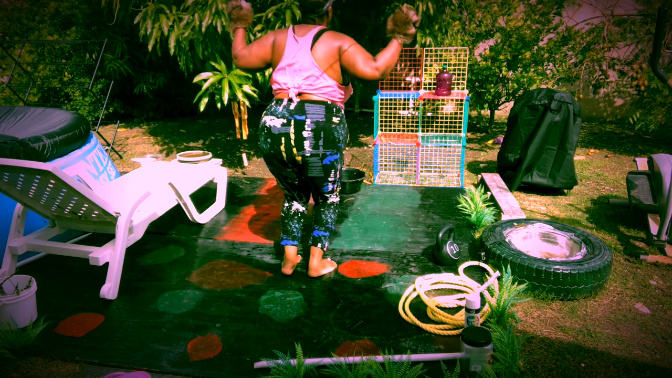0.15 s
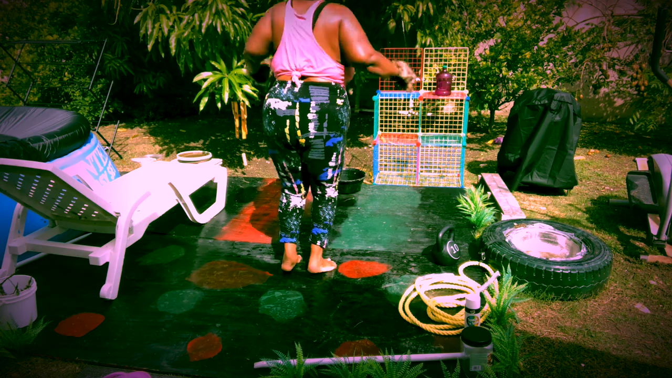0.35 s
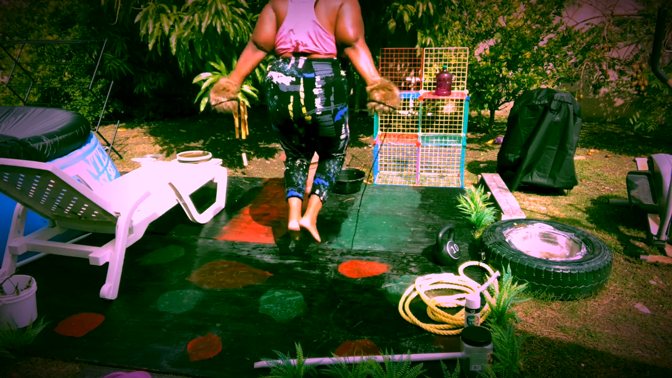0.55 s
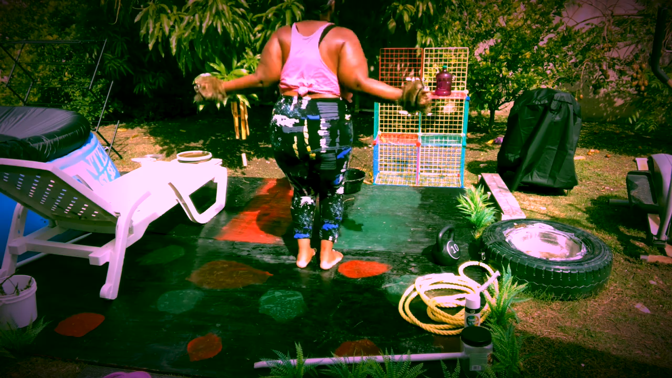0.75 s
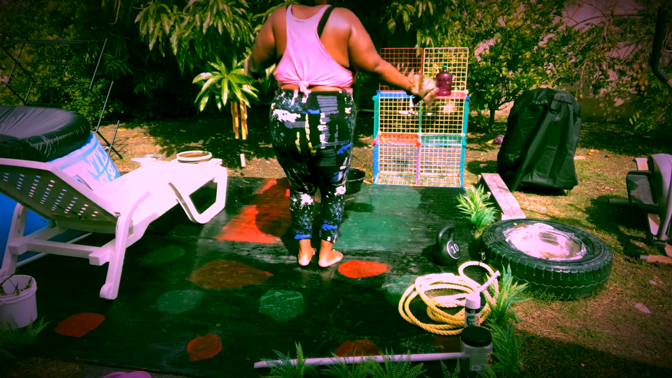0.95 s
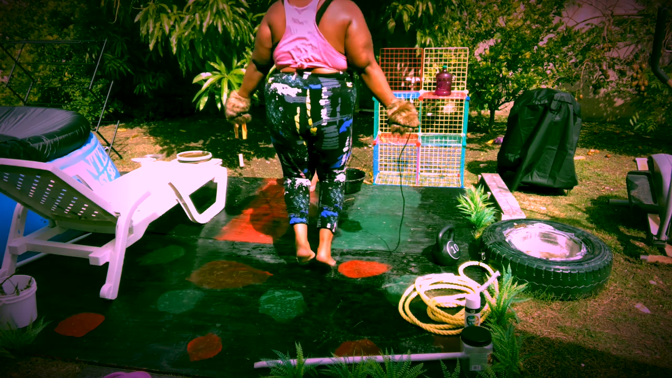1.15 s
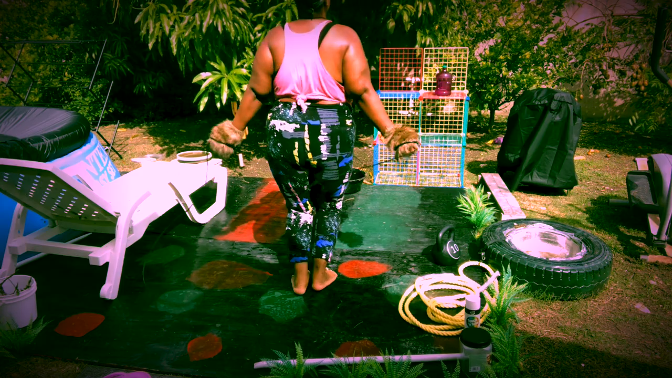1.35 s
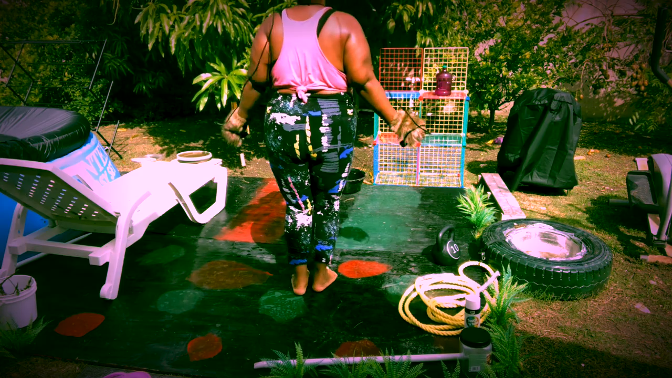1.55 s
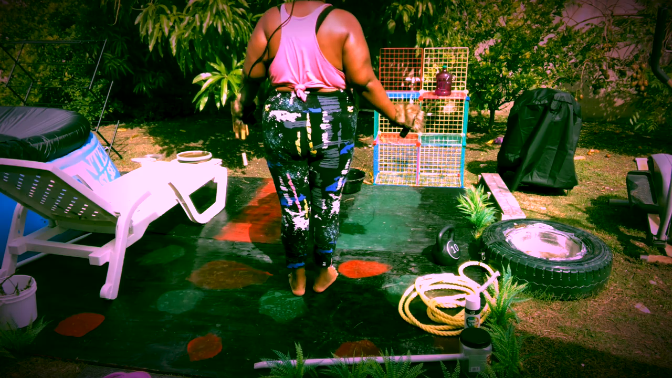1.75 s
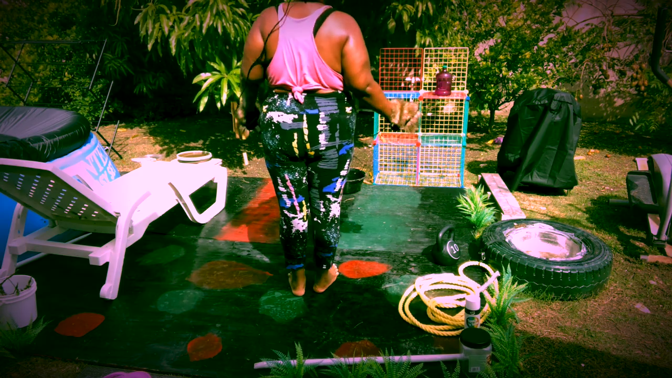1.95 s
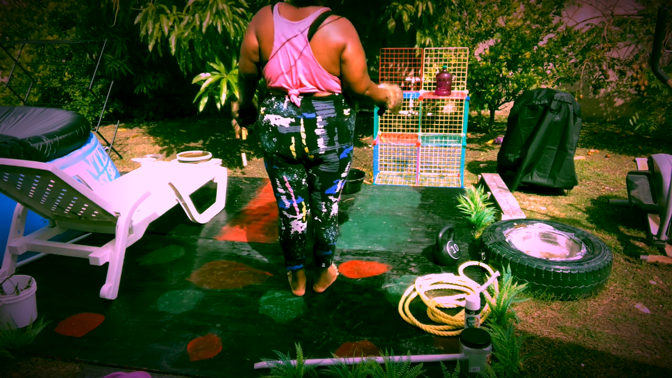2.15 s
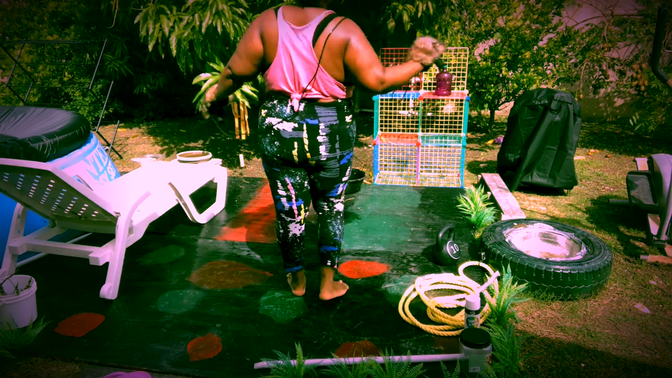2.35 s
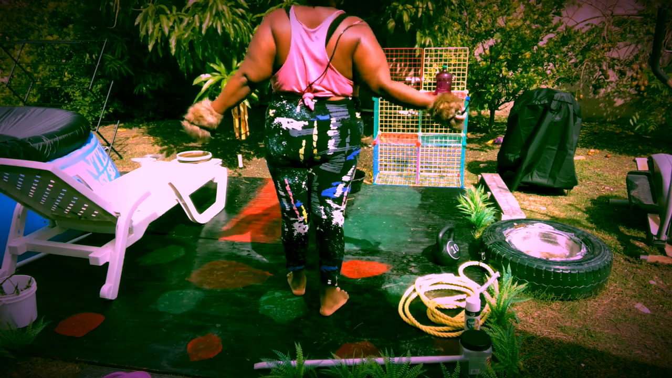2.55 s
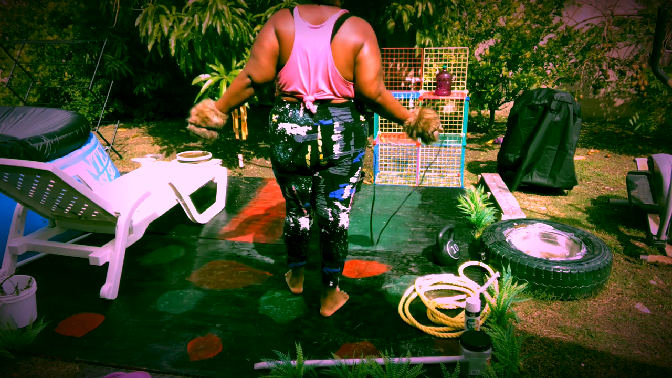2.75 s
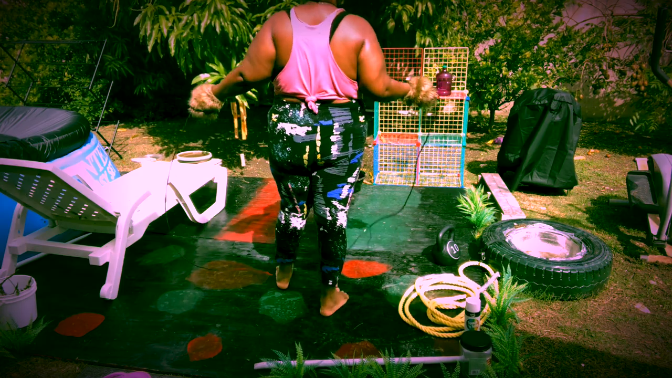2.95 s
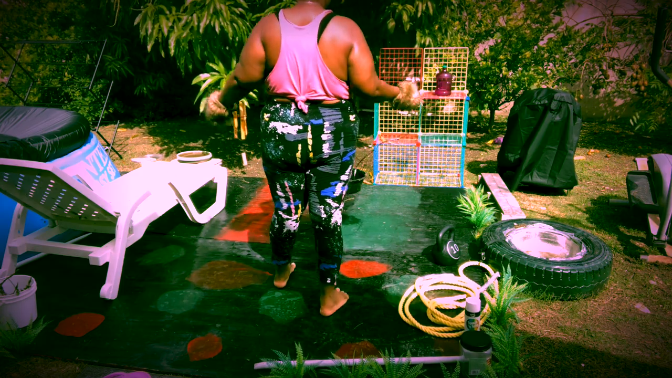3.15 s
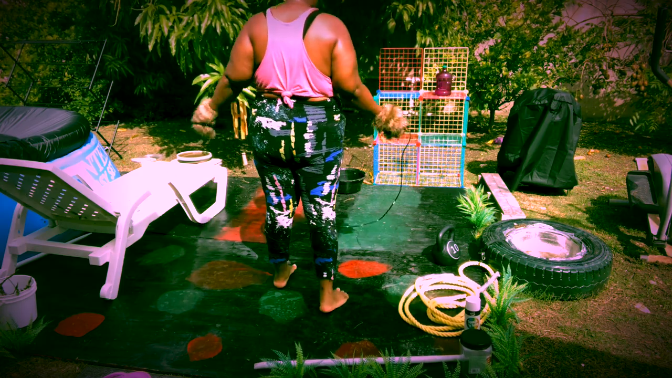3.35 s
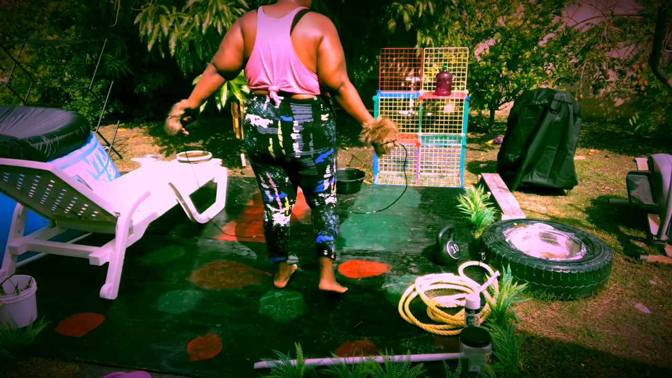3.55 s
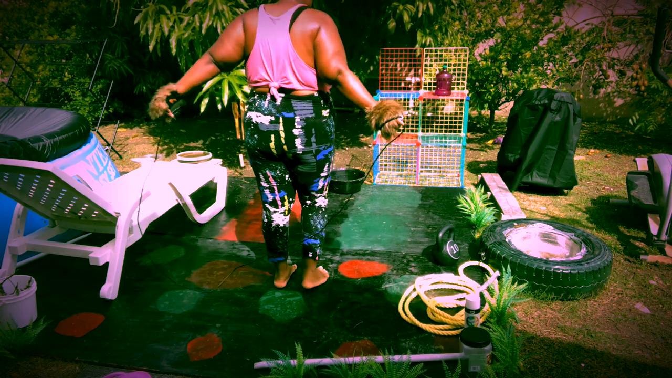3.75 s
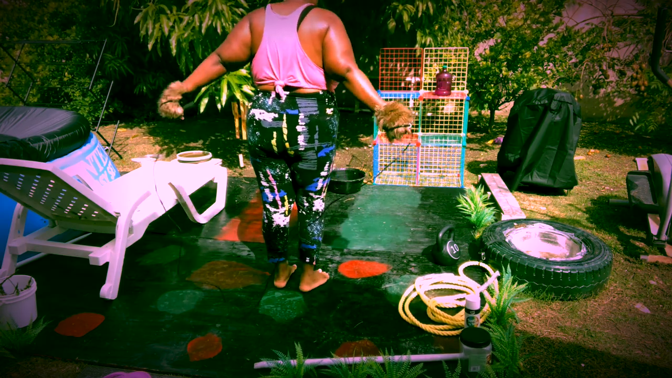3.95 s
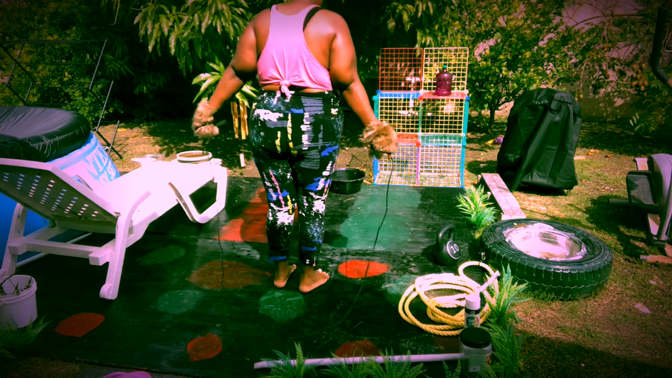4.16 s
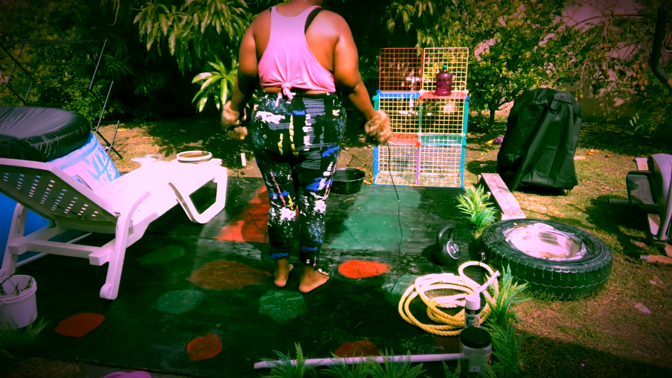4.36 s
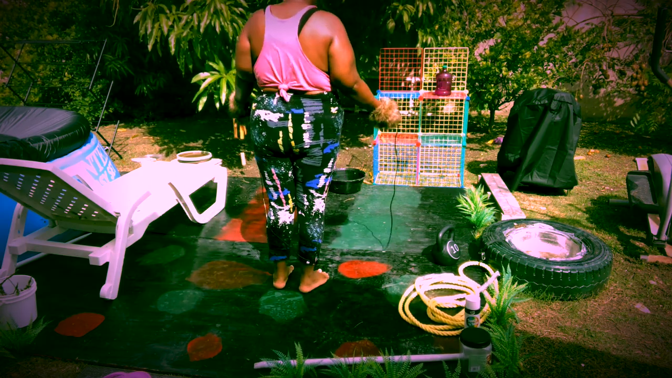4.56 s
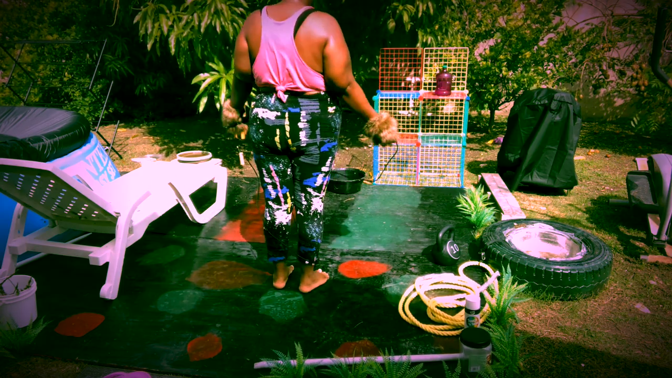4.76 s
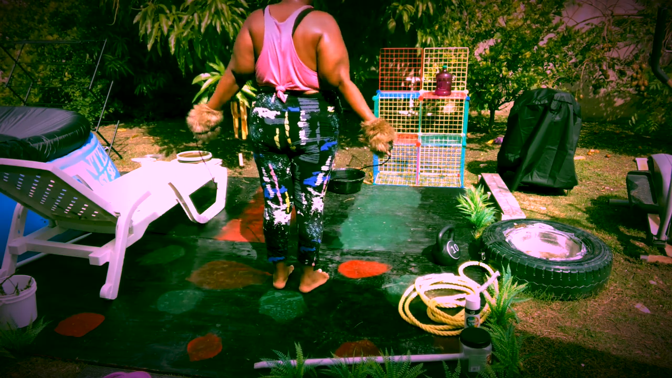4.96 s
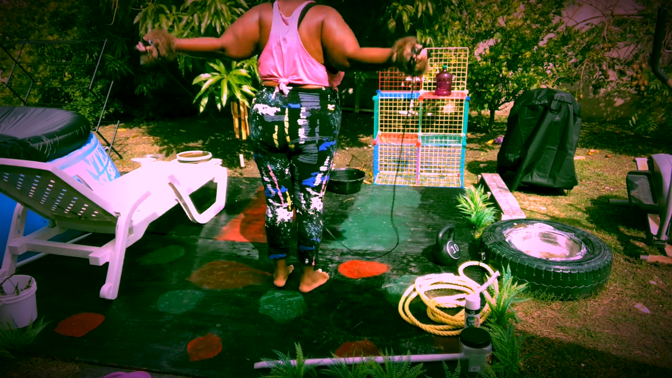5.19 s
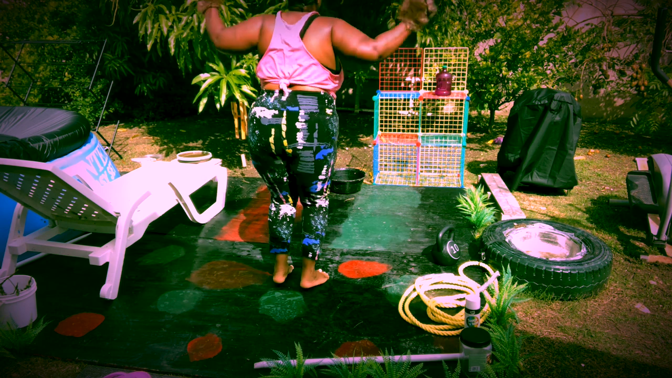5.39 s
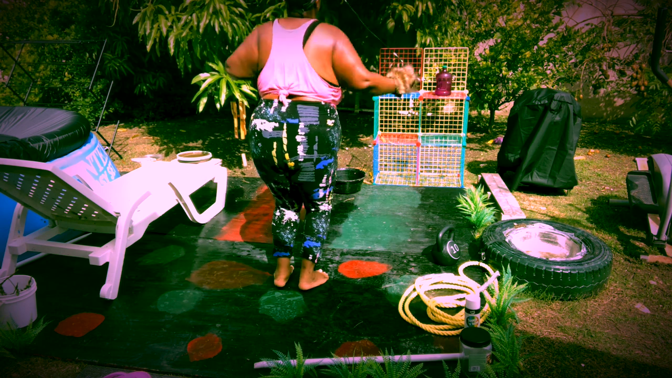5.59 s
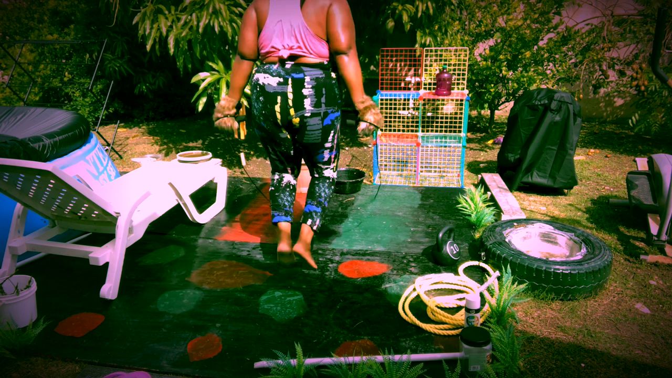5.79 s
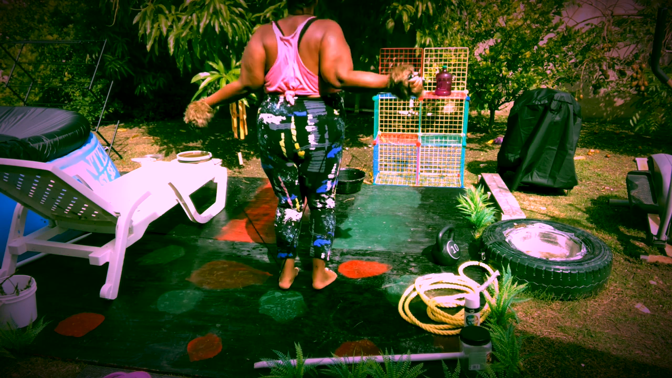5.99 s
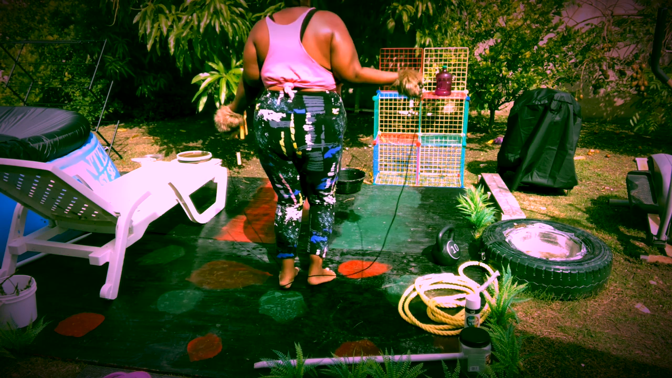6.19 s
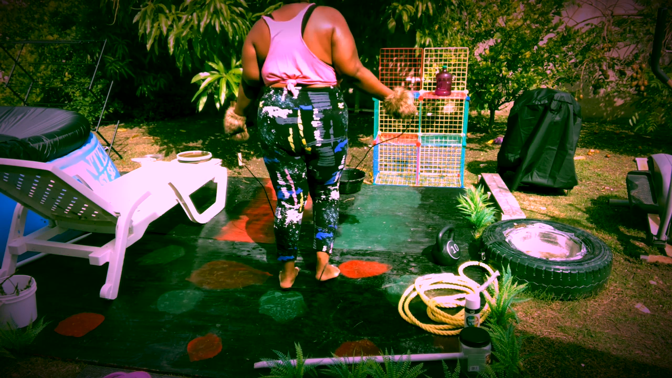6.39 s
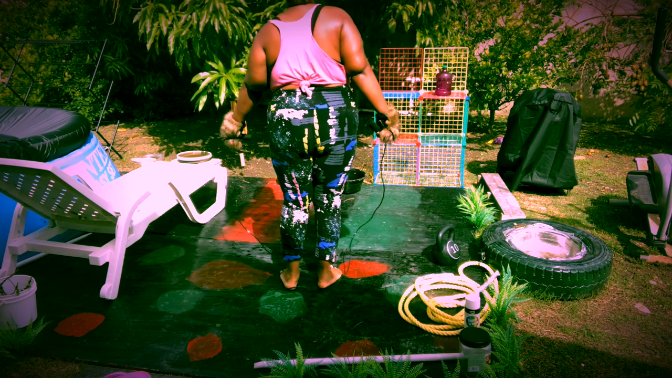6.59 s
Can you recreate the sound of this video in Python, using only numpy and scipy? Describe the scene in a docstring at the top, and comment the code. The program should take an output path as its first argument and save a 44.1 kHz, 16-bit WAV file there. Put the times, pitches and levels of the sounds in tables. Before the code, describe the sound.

A jump rope swishes and cracks on a wet mat outdoors, with bare feet thudding and shuffling between tries over a steady low murmur.

```python
"""Sharp wet cracks, thuds and scuffs: barefoot rope skipping on a wet mat in a back yard, three tries.
The feet scuff off, the rope whistles through the air and cracks on the mat, then the landing thuds
and the mat shudders. Between tries, feet shuffle and the slack rope drags.
Walls and plants scatter each crack over a steady outdoor murmur with two far-off peeps.
Gain control ducks after loud hits; a limiter holds the peaks."""
import sys
import numpy as np
from scipy import signal
from scipy.fft import rfft, irfft, next_fast_len
from scipy.io import wavfile
from scipy.ndimage import uniform_filter1d, minimum_filter1d

SR = 44100
rng = np.random.default_rng(int(sys.argv[2]) if len(sys.argv) > 2 else 0)


def store_wav(level_fs):
    """Save 16-bit WAV to argv[1]."""
    pcm = np.round(np.clip(np.atleast_2d(level_fs), -1, 1) * 32767)
    wavfile.write(sys.argv[1], SR, pcm.T.astype(np.int16))


N = 292383
T = np.arange(SR) / SR  # 1 s, for single events
HZ = np.fft.rfftfreq(SR, 1 / SR)
SMACK_HZ, SMACK_MS = 599, 1.27  # bare sole on the mat
# mat modes: f/Hz, level/dB, t60/s
MAT_MODES = [(102, -11.5, 0.26), (161.4, -12, 0.5), (252.8, -4.5, 0.48), (308.5, -13, 0.67),
             (349.5, -4.5, 0.15), (466.6, -12, 0.25), (593.6, -14.5, .22)]


def amp(db):
    """dB to gain."""
    return 10 ** (np.asarray(db) / 20)


def unit_rms(x):
    """Scale to rms 1."""
    return x / np.sqrt(np.mean(x ** 2) + 1e-20)


def log_interp(points, hz):
    """Interpolate (f/Hz, value) rows over log frequency."""
    f, value = np.transpose(points)
    return np.interp(np.log(hz + 1), np.log(f + 1), value)


def tilted(points, db_per_oct):
    """Spectrum in dB, tilted about 4.5 kHz."""
    return log_interp(points, HZ) + db_per_oct * np.log2(np.maximum(HZ, 400) / 4500)


def hump(hz, width_oct):
    """Bell of height 1 over log frequency."""
    return np.exp(-(np.log2((HZ + 1) / hz) / width_oct) ** 2)


def add(mix, s, sound):
    """Mix a sound in at time s."""
    part = mix[max(round(s * SR), 0):][:len(sound)]
    part += sound[:len(part)]


def noise(gain):
    """Noise of rms 1 with the given spectrum."""
    return unit_rms(irfft(gain * rfft(rng.standard_normal(2 * len(gain) - 2))))


def band_noise(hz, width_hz):
    """1 s of noise, rms 1, within about width_hz of hz."""
    return noise(1 / (1 + ((HZ - hz) / width_hz) ** 4))


def jitter(samples):
    """1 s of moving-average noise, rms 1."""
    return unit_rms(uniform_filter1d(rng.standard_normal(SR), samples))


def click(spectrum_db):
    """Minimum-phase impulse of energy 1."""
    log_gain = np.log(amp(np.concatenate([spectrum_db, spectrum_db[-2:0:-1]])))
    impulse = np.fft.ifft(np.exp(np.conj(signal.hilbert(log_gain)))).real
    return impulse / np.linalg.norm(impulse)


def yard_echo(x, taps_per_s=3000, build_s=0.0036, uneven_db=4):
    """Walls and plants return sparse, uneven echoes; each band dies at its own rate."""
    # echo decay: f/Hz, t60/s
    decay = [(250, 0.46), (700, 0.1), (2000, 0.25), (4500, 0.24), (12000, 0.25)]
    taps = rng.choice([-1., 1.], SR) * (rng.random(SR) < taps_per_s / SR)
    taps *= 1 - np.exp(-(T / build_s) ** 2)
    taps *= amp(uneven_db * rng.standard_normal(SR))
    hz, t, bands = signal.stft(taps, SR, nperseg=256)
    fade = amp(-60 * t / log_interp(decay, hz)[:, None])
    tail = signal.istft(bands * fade, SR, nperseg=256)[1]
    return signal.fftconvolve(x, tail / np.linalg.norm(tail))[:len(x)]


def murmur(level_db=-42.5, drift_db=.5, low_cut_hz=42):
    """Distant traffic and leaves with a low drone; the level drifts slightly."""
    # murmur spectrum: f/Hz, level/dB
    spectrum = [(15, -52), (25, -18), (59, -3.5), (76, -2.5), (134, -9), (212, -10.5), (270, -9),
                (384, -14), (516, -14.5), (887, -20), (1940, -25), (2990, -30.5), (4370, -28.5),
                (14800, -49), (16000, -50)]
    # humps on it: f/Hz, width/Hz, boost/dB
    humps = [(75, 14, 3.5), (101, 3.3, 0.5), (4130, 2500, 0), (7500, 280, 2.5)]
    hz = np.fft.rfftfreq(2 * next_fast_len(N // 2 + 1), 1 / SR)
    humps_db = sum(db * np.exp(-((hz - f) / width) ** 2) for f, width, db in humps)
    low_cut = hz ** 2 / np.hypot(hz ** 2, low_cut_hz ** 2)
    drift = noise(1 / (1 + (hz / 3) ** 4))
    steady = noise(amp(log_interp(spectrum, hz) + humps_db) * low_cut)
    return (steady * amp(level_db + drift_db * drift))[:N]


def whistles(rows, flutter, echo_db=-4):
    """Short, wavering, gliding tones."""
    out, t = np.zeros(N), T - .1
    for s, db, half_s, hz, oct_per_s in rows:
        turns = np.cumsum(hz * 2 ** (oct_per_s * t)) / SR
        tone = np.sqrt(2) * np.sin(2 * np.pi * turns)
        waver = 1 + flutter * noise(1 / (1 + (HZ / 90) ** 2))
        add(out, s + t[0], amp(db) * waver * tone * np.exp(-(t / half_s) ** 2))
    return out + amp(echo_db) * yard_echo(out)


def peeps():
    """Faint, far-off peeps."""
    # peeps: peak t/s, level/dB, half length/s, f/Hz, glide/(oct/s)
    tones = [(4.025, -65, 0.019, 4360, 1), (4.16, -58, 0.016, 3440, -0.5)]
    return whistles(tones, flutter=.6)


def scuff(s, db, rise_s, fall_s, tilt_db_oct, chirp_db, grain_db=3, echo_db=-9):
    """Rubbing: a swarm of tiny slips swells and fades; the water film makes them chirp."""
    # spectrum of one slip: f/Hz, level/dB
    spectrum = [(100, -20), (300, -2.5), (700, -2.5), (1500, -3.5), (2100, -0.5), (3000, -9.5),
                (4200, -6.5), (5400, -2), (7000, -13.5), (9000, -21), (16000, -25)]
    t = T - .1
    slips = unit_rms(rng.standard_normal(SR) * amp(grain_db * jitter(40)))
    envelope = np.exp(-(np.minimum(t, 0) / rise_s) ** 2 - np.maximum(t, 0) / fall_s)
    slip = click(tilted(spectrum, tilt_db_oct) + chirp_db * hump(hz=5350, width_oct=0.26))
    sound = amp(db) * signal.fftconvolve(slips * envelope, slip)[:SR]
    return s + t[0], sound + amp(echo_db) * yard_echo(sound)


def wet_scuff(s, db, rise_s, fall_s, chirp_db):
    """A wetter spot chirps more and sounds brighter."""
    return scuff(s, db, rise_s, fall_s, tilt_db_oct=-0.81 + 0.58 * chirp_db, chirp_db=chirp_db)


def thud(s, db, hz, ms, mat_db, sag=0.1821, echo_db=-11):
    """A push of a few cycles, its pitch sinking as the contact flattens; the mat rings on."""
    t = T - .05
    u = t / (ms / 1000)
    turns = np.cumsum(hz * (1 - sag * np.tanh(u))) / SR
    push = np.sin(2 * np.pi * (turns + rng.random())) / np.cosh(np.clip(1.7 * u, -50, 50))
    detunes = rng.uniform(.96, 1.03, len(MAT_MODES))
    modes = sum(amp(level - 60 * T / t60) * np.sin(2 * np.pi * f * detune * T)
                for (f, level, t60), detune in zip(MAT_MODES, detunes))
    ring = unit_rms(signal.fftconvolve(push, modes)[:SR]) * push.std()
    sound = amp(db) * (push + amp(mat_db) * ring)
    return s + t[0], sound + amp(echo_db) * yard_echo(sound)


def crack(s, db, tilt_db_oct, lag_ms, splash_db, snap_hz, snap_db, echo_db,
          snap_oct=0.23, top_db_oct=0, ripple_db=2.5, splash_at_s=0.0023, splash_half_s=0.0072):
    """A wet slap snaps at one point, then spreads along the mat: a fast falling chirp and a splash."""
    # slap spectrum: f/Hz, level/dB
    spectrum = [(60, -60), (160, -13), (280, -0.5), (380, -4.5), (510, 1), (700, -2), (1100, -3.5),
                (2000, -6), (2800, -8), (3800, -5.5), (5000, -5), (6300, -9), (8200, -17), (16000, -22)]
    lead_s = .002
    delay_s = lead_s + lag_ms / np.maximum(HZ, 300)  # lows come last; lag_ms applies at 1 kHz
    sweep = np.exp(-2j * np.pi * np.cumsum(delay_s))
    ripple = unit_rms(signal.oaconvolve(rng.standard_normal(len(HZ)), np.hanning(600), "same"))
    top_oct = np.log2(np.maximum(HZ / 7800, 1))
    base_db = tilted(spectrum, tilt_db_oct) + top_db_oct * top_oct
    ring_db = snap_db * hump(snap_hz, snap_oct) + ripple_db * ripple  # first contact rings briefly
    dull_db = base_db + 0.12 * ring_db - 8 * top_oct  # for splash and echo
    snap = irfft(rfft(click(base_db + ring_db)) * sweep) * (T < .5)
    spread = irfft(rfft(click(dull_db)) * sweep) * (T < .5)
    drops = rng.standard_normal(SR) * np.exp(-((T - splash_at_s) / splash_half_s) ** 2)
    splash = unit_rms(signal.fftconvolve(spread, drops)[:SR]) * snap.std()
    return s - lead_s, amp(db) * (snap + amp(splash_db) * splash + amp(echo_db) * yard_echo(spread))


def drags():
    """Feet shuffle and the slack rope trails over the wet mat."""
    # drags: peak t/s, level/dB, fade/s, chirp/dB
    rubs = [(.812, -42, 0.011, -0.5), (.955, -45.5, 0.017, 2), (1.114, -45.5, 0.017, 1),
            (1.64, -47.5, 0.036, 0), (2.232, -39, 0.018, 2), (2.715, -44.5, 0.063, -4.5),
            (3.558, -43.5, 0.0095, 2), (3.783, -37.5, 0.0088, -6.5), (4.385, -53, .025, 7),
            (6.435, -44.5, 0.016, -3.5), (6.595, -43.5, 0.047, -1)]
    out = np.zeros(N)
    for s, db, fall_s, chirp_db in rubs:
        add(out, *wet_scuff(s, db, rise_s=0.49 * fall_s, fall_s=fall_s, chirp_db=chirp_db))
    return out


def steps(smack_lead_s=0.00678):
    """Small steps to regain balance: the sole smacks just before the weight arrives."""
    # steps: t/s, push/dB, f/Hz, smack/dB
    footfalls = [(1.379, -15, 251.5, -38), (1.502, -24, 298.8, -28.5), (6.147, -24, 271, -38),
                 (6.235, -26, 301, -30), (6.295, -20, 310.5, -22.5), (6.434, -29.5, 321, -35)]
    out = np.zeros(N)
    for s, db, hz, smack_db in footfalls:
        add(out, *thud(s - smack_lead_s, smack_db, SMACK_HZ, SMACK_MS, mat_db=-4))
        add(out, *thud(s, db, hz, ms=4.7, mat_db=-11.5))
    return out


def takeoffs(slide_lead_s=.012, peel_lead_s=0.0032):
    """The soles slide, peel off with a scuff and a smack, and push the mat away."""
    # takeoffs: t/s, push/dB, smack/dB, scuff/dB, chirp/dB
    jumps = [(.452, -22, -14.5, -28.5, 1), (1.058, -32.5, -45, -36.5, 6), (5.752, -22, -15.5, -28.5, 0.5)]
    out = np.zeros(N)
    for s, push_db, smack_db, scuff_db, chirp_db in jumps:
        add(out, *wet_scuff(s - slide_lead_s, scuff_db - 7, rise_s=.014, fall_s=0.03, chirp_db=-1.5))
        add(out, *wet_scuff(s - peel_lead_s, scuff_db, rise_s=0.0072, fall_s=0.0077, chirp_db=chirp_db))
        add(out, *thud(s - peel_lead_s, smack_db, SMACK_HZ, SMACK_MS, mat_db=-6.5))
        add(out, *thud(s, push_db, hz=281, ms=5.1, mat_db=-6.5))
    return out


def mat_shudder(s, db, settle_s, ring_db, onset_s=0.0029, squelch_t60_s=0.29,
                ring_hold_s=0.12, ring_t60_s=0.41):
    """Settling weight shakes the mat's modes at random and squelches water from under the soles."""
    # squelch spectrum: f/Hz, level/dB
    spectrum = [(60, -28), (200, 9), (550, 10), (800, -1), (1200, -12), (2000, -10.5), (3000, -20.5),
                (4400, -27), (6500, -23), (9000, -34), (16000, -54)]
    # faint high ringing: f/Hz, width/Hz, level/dB
    ring_bands = [(1070, 90, 1.5), (1770, 51, -3), (2130, 15, -5), (4310, 230, -6)]
    fading_s = np.maximum(T - 0.81 * settle_s, 0)
    body = sum(amp(level - 60 * fading_s / t60) * band_noise(f, width_hz=19)
               for f, level, t60 in MAT_MODES)
    squelch_db = -3 + 2.5 * jitter(300) - 60 * fading_s / squelch_t60_s
    squelch = noise(amp(log_interp(spectrum, HZ))) * amp(squelch_db)
    ring = sum(amp(level) * band_noise(f, width) for f, width, level in ring_bands)
    ring *= amp(ring_db - 60 * np.maximum(T - ring_hold_s, 0) / ring_t60_s)
    return s, amp(db) * (1.07 * body + squelch + ring) * (1 - np.exp(-T / onset_s))


def landings():
    """Toes skid, water splats, the balls of the feet thump, the ground takes the weight, heels drop."""
    # landings: t/s, skid/dB, splat/dB, splat tilt/(dB/oct), splat f/Hz, thump/dB, thump f/Hz,
    # smack/dB, deep bump/dB, heel delay/s, heels/dB, shudder/dB, high ring/dB re shudder
    impacts = [(0.7082, -30, -4.5, 2, 7000, -7, 306.7, -18.5, -25, 0.0163, -31, -22, -51),
               (1.2568, -35, 10.5, -10, 5300, -7.5, 254.5, -8, -18, .056, -16.5, -20, -29),
               (5.9814, -46, 2, -4, 2000, -3, 254.4, -15.5, -11, .114, -10.5, -21.5, -23)]
    # wet mat popping under settling feet: t/s, level/dB, length/ms
    pops = [(.7195, -17, .9), (.7345, -31, .8), (1.2704, -2, .45), (1.299, -8, 0.33), (1.392, -24, 0.78),
            (6.023, -12, 1.3)]
    out = np.zeros(N)
    for (s, skid_db, splat_db, tilt_db_oct, splat_hz, thump_db, thump_hz,
         smack_db, bump_db, settle_s, heel_db, shudder_db, ring_db) in impacts:
        add(out, *scuff(s - 0.01, skid_db, rise_s=0.0052, fall_s=0.0037, tilt_db_oct=1, chirp_db=-1))
        add(out, *crack(s - .008, splat_db, tilt_db_oct, lag_ms=0.845, splash_db=2.5,
                        snap_hz=splat_hz, snap_db=17, echo_db=0))
        add(out, *thud(s, thump_db, thump_hz, ms=3.9, mat_db=-23))
        add(out, *thud(s, smack_db, hz=776, ms=1.6, mat_db=-4.5))
        add(out, *thud(s + .012, bump_db, hz=121, ms=5.4, mat_db=-7))
        add(out, *mat_shudder(s + .008, shudder_db, settle_s, ring_db))
        add(out, *thud(s + settle_s, heel_db, hz=311.6, ms=11.3, mat_db=-6))
    for s, db, ms in pops:
        add(out, *thud(s, db, hz=811, ms=ms, mat_db=-5))
    return out


def rope(full_stroke_db=21, nudge_delay_s=0.0049):
    """The rope sheds whistling eddies, cracks on the wet mat and nudges it; flung drops tick."""
    # rope cutting the air: peak t/s, level/dB, half length/s, f/Hz, glide/(oct/s)
    swishes = [(.670, -31.5, 0.015, 660, -10), (.838, -43.5, 0.025, 410, -2), (5.825, -39, 0.023, 520, -1),
               (5.935, -40, 0.013, 800, -15.5)]
    # rope hitting the mat: t/s, level/dB, lag at 1 kHz/ms, splash/dB, snap f/Hz, snap width/oct, snap/dB
    slaps = [(0.5697, 10.5, 0.75, -13, 4430, 0.69, 9), (1.1304, 13, 0.89, -7.5, 4960, 0.22, 12.5),
             (1.19, -2, 0.76, 0, 5330, .35, 21), (1.195, -2, 0.93, -12, 5050, .3, 11),
             (2.415, -10, 1.9, -1.5, 4970, 0.19, 15), (4.5368, 0, 2, 0.5, 3970, 0.62, 8),
             (5.842, 15, 1.44, -22, 6260, .6, 4.5), (6.3163, 0.5, 0.88, -8, 5400, 0.38, 13),
             (6.5378, -10.5, 1.63, -7, 6250, .3, 4)]
    # flung water: t/s, level/dB
    drips = [(2.9569, -29), (3.776, -21.5), (5.9379, -17)]
    out = whistles(swishes, flutter=0.29)
    for s, db, lag_ms, splash_db, snap_hz, snap_oct, snap_db in slaps:
        tilt_db_oct = -1.92 + 0.19 * db  # harder is brighter
        top_db_oct = 0.3 * (db - full_stroke_db)  # softer loses the top treble
        add(out, *crack(s, db, tilt_db_oct, lag_ms, splash_db, snap_hz, snap_db,
                        echo_db=-4.5, snap_oct=snap_oct, top_db_oct=top_db_oct))
        nudge_db, nudge_hz = -26 + 0.54 * db, 280.4 + 17 * max(db, 0)
        add(out, *thud(s + nudge_delay_s, nudge_db, nudge_hz, ms=3.75, mat_db=-5))
    for s, db in drips:
        add(out, *crack(s, db, tilt_db_oct=3.8, lag_ms=0.53, splash_db=2,
                        snap_hz=2300, snap_db=11, echo_db=0))
    return out


def scene():
    """Rope, feet and mat over the outdoor murmur; mono."""
    feet = takeoffs() + landings() + steps() + drags()
    outdoors = murmur() + peeps()
    return (rope() + feet + outdoors)[None]


def limiter(x, samples=40):
    """The gain dips for about 1 ms round any peak above full scale."""
    gain = 1 / np.maximum(abs(x), 1)
    return x * uniform_filter1d(minimum_filter1d(gain, samples), samples)


def record(dry, threshold_db=-28, duck_db_per_db=0.29, recover_db_per_s=22, sense_s=0.012, top_hz=16050):
    """Gain control ducks after loud hits, a limiter holds the cracks, a low-pass ends the band."""
    pole = np.exp(-1 / (sense_s * SR))
    smoother = [1 - pole], [1, -pole]
    power_db = 10 * np.log10(signal.lfilter(*smoother, dry[0] ** 2) + 1e-12)
    recovery_db = np.arange(N) * recover_db_per_s / SR
    held_db = np.maximum.accumulate(power_db + recovery_db) - recovery_db
    over_db = np.maximum(held_db - threshold_db, 0)
    ducked = dry * amp(-duck_db_per_db * signal.lfilter(*smoother, over_db))
    low_pass = signal.firwin(511, top_hz, window=("kaiser", 9), fs=SR)
    return signal.oaconvolve(limiter(ducked), low_pass[None], "same")


dry = scene()
out = record(dry)
store_wav(out)
```